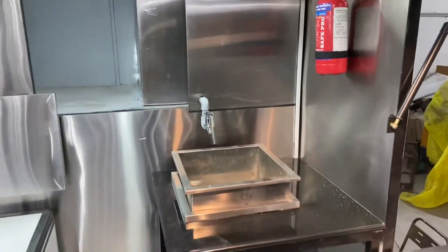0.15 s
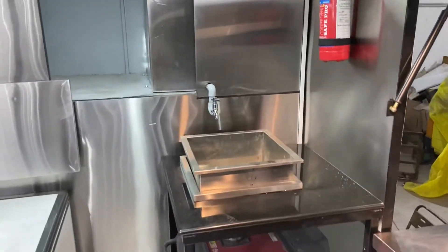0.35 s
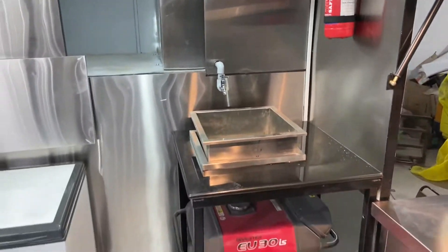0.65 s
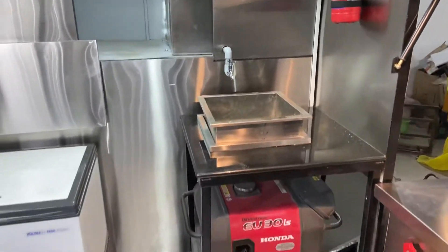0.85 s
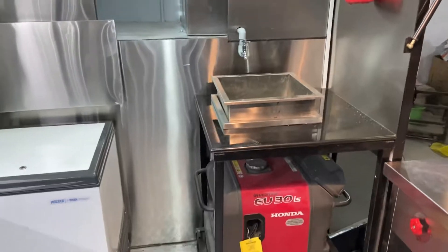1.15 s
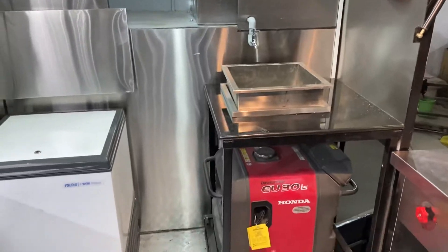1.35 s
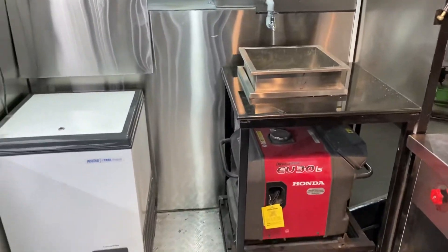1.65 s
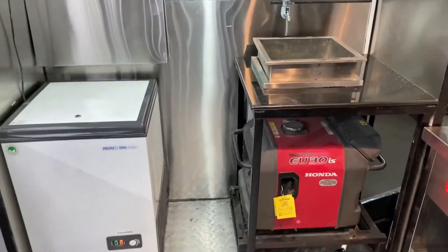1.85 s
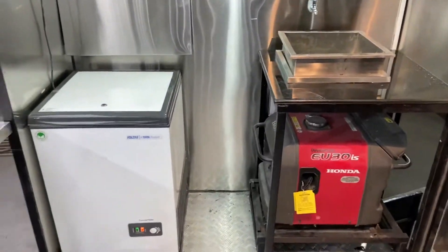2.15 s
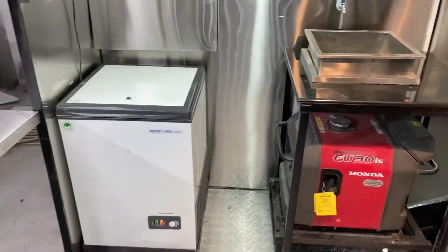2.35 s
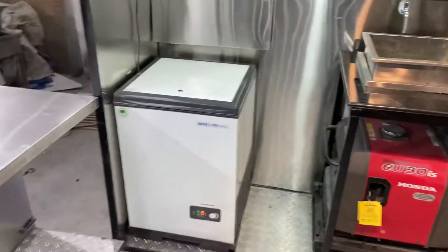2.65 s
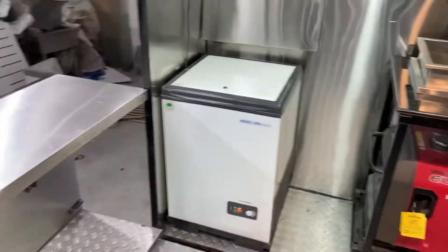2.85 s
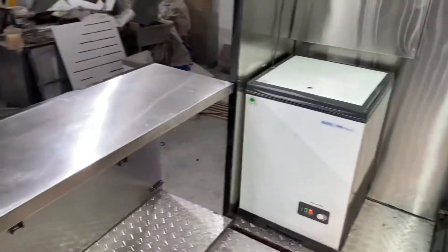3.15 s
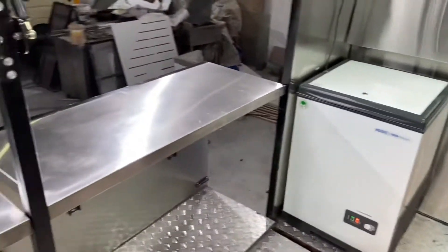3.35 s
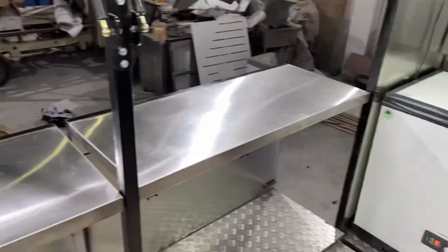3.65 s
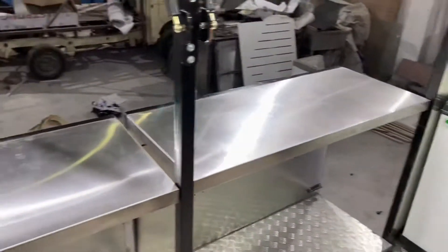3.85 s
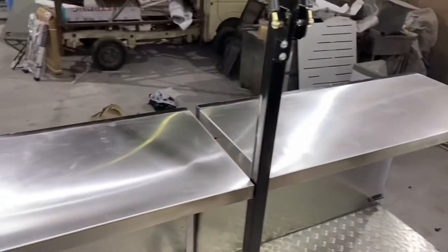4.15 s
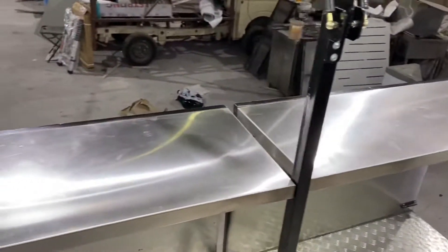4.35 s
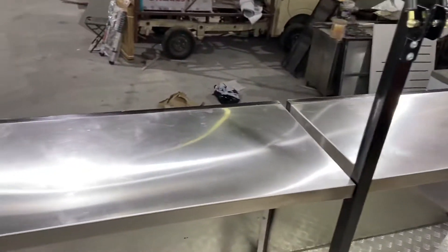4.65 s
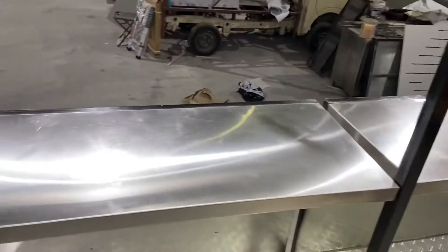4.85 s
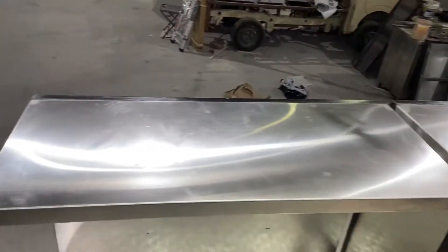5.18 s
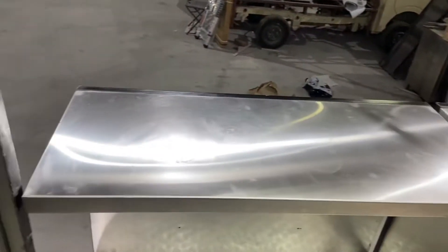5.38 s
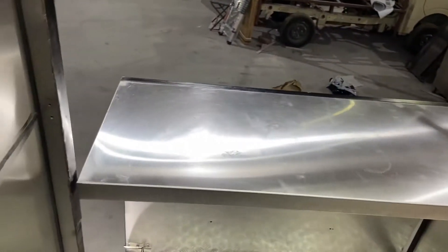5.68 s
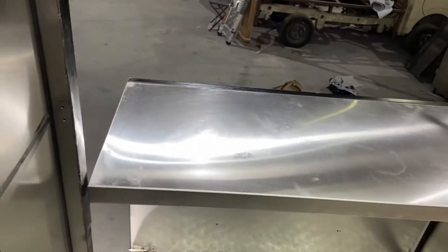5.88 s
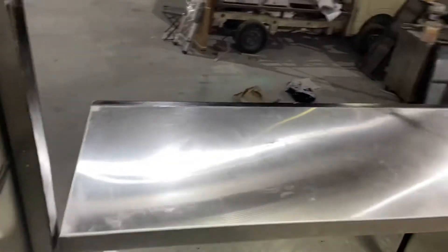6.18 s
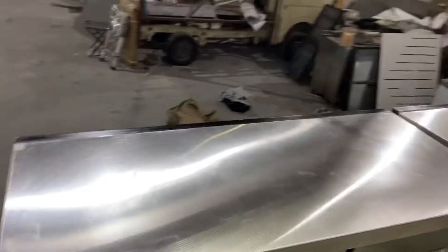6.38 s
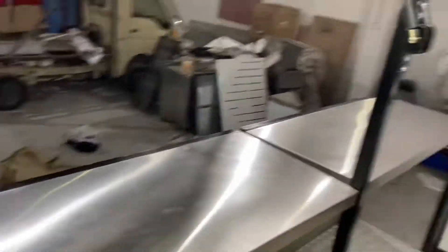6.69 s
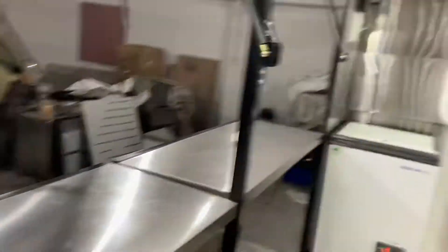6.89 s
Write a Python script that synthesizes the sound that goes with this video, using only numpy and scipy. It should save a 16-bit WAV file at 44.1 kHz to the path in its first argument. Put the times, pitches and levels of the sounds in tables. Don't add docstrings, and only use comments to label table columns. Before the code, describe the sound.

Hand-held stereo pickup in a hard-walled workshop: low droning motors, uneven and slowly shifting in strength, over a dull rumbling wash of air and fans. Barely audible scuffs come first, then a soft double knock and later a duller one. A distant metal clink follows with two thinner bounces, then small knocks, and finally a tiny tick, dry scuff and short low thump.

```python
import sys
import numpy as np
from scipy import signal
from scipy.fft import rfft, irfft, next_fast_len
from scipy.io import wavfile
from scipy.ndimage import uniform_filter1d

SR = 44100
rng = np.random.default_rng(int(sys.argv[2]) if len(sys.argv) > 2 else 0)


def bounce(signal):
    frames = np.transpose(np.atleast_2d(signal))
    limited = np.clip(frames, -1, 1)
    pcm = np.round(limited * 32767).astype(np.int16)
    wavfile.write(sys.argv[1], SR, pcm)


def gain_from_db(level_db):
    decades = np.asarray(level_db, float) / 20
    return 10 ** decades


N = 309714

# pitch [Hz], lead of the left [radians].
PORT_LEAD = [(20, 0), (90, -.37), (180, -.72), (430, -.8), (750, 1), (1290, 2.1), (2200, .3), (3300, .6),
             (7000, 0), (9000, -3.14), (11100, -6.28), (13100, -9.42), (15200, -12.56)]
# pitch [Hz], left over right [dB].
PORT_BALANCE = [(60, -0.5), (150, 1.5), (380, 0.0), (950, -2), (2380, 0), (5980, 0.5), (15000, -0.5)]


def evened(x):
    return x / np.sqrt(np.mean(x ** 2) + 1e-20)


def read(points, hz):
    f, value = np.transpose(points)
    return np.interp(np.log(hz + 1), np.log(f + 1), value)


def add(mix, s, sound):
    part = mix[..., round(s * SR):][..., :sound.shape[-1]]
    part += sound[..., :part.shape[-1]]


def above(x, hz):
    return signal.sosfilt(signal.butter(2, np.clip(hz, 50, 15000), "high", fs=SR, output="sos"), x)


def below(x, hz):
    return signal.sosfilt(signal.butter(2, np.clip(hz, 5, 20000), fs=SR, output="sos"), x)


def walked(t):
    # time in seconds, share of the way [0-1 and a little beyond].
    sweep = [(0.0, 0.027), (0.7, 0.085), (1.5, 0.173), (2.5, 0.247), (3.5, 0.378), (4.3, 0.509),
             (5.0, 0.689), (5.8, 0.973), (6.4, 1.063), (7.03, 1.127)]
    return np.interp(t, *np.transpose(sweep))


def standing(way, crest_db, depth_db, waves, crest):
    return crest_db - depth_db * np.sin(np.pi * (waves * way - crest)) ** 2


def tone(hz, db, turns):
    side = np.array([[0.5], [-0.5]])
    half_lead = side * read(PORT_LEAD, hz)
    level = np.sqrt(2) * gain_from_db(db + side * read(PORT_BALANCE, hz))
    phase = 2 * np.pi * (hz * np.arange(N) / SR - turns)
    return level / np.cos(half_lead) * np.cos(phase + half_lead)


def hums():
    hum_hz = [88.6, 89.05, 97.52, 100.14, 177.13, 178.02, 195.07]
    # crest level in dB, trough depth in dB,
    # waves along the way, crest place in waves.
    hum_waves = [(-31.5, 28, 0.18, 0.12), (-35, 27, .097, 0.16), (-23.5, 17.5, 0.43, -0.11),
                 (-20.5, 29.5, .1, -0.21), (-43, 7, 0.97, 0.58), (-39.5, 6.5, 1.11, 0.53),
                 (-44, 15.5, 0.8, .12)]
    # start [m], length gained along the way [m], drift [m/s].
    hum_paths = [(1.023, -0.223, -0.011), (4.281, -0.367, 0.026), (3.189, 3.903, -0.552),
                 (1.15, -0.033, 0.041), (1.319, -0.801, 0.095), (1.306, 0.387, -0.062),
                 (2.071, 1.949, -0.266)]
    t = np.arange(N) / SR
    way = walked(t)
    out = 0
    for hz, wave, (metres, gained, drift) in zip(hum_hz, hum_waves, hum_paths):
        delay_s = (metres + gained * way + drift * t) / 343
        out = out + tone(hz, standing(way, *wave), hz * delay_s)
    return out


def whine(wander=0.08, flutter_db=1.44):
    order_hz = [300.6, 267.0, 447.0, 357.7, 853.6, 953.7, 1045.4, 897.5]
    # usual level in dB, change in dB,
    # place and width as shares of the way [0-1].
    spots = [(-54, 6, 0.16, .17), (-51.5, -13, 0.38, 0.38), (-65, 12, 0.51, 0.06), (-62.5, 5.5, 1, 0.4),
             (-52.5, -24, .25, .12), (-62, 10, .35, 0.07), (-70, 13, 0.78, 0.27), (-66.5, 10, .55, 0.13)]
    # pitch [Hz], level [dB].
    shaft_lines = [(42.8, -56.5), (49.55, -55.5), (67.3, -52.5), (69.8, -53), (118.7, -49.5), (802, -70.5),
                   (869, -62.5), (836, -62.5)]
    t = np.arange(N) / SR
    way = walked(t)
    steps = np.arange(44) / 6
    lines = []
    for hz, (db, change_db, place, width) in zip(order_hz, spots):
        lines.append((hz, db + change_db * np.exp(-((way - place) / width) ** 2)))
    out = 0
    for hz, db in lines + shaft_lines:
        slip, flutter = rng.standard_normal((2, len(steps)))
        turns = np.interp(t, steps, wander * np.cumsum(slip))
        out = out + tone(hz, db + flutter_db * np.interp(t, steps, flutter), turns)
    return out


def wash(patchy_db=1.0, modal_db=2.0, flicker_db=0.43):
    # pitch [Hz], density [dB per Hz].
    air_colour = [(20, -47), (45, -13.5), (70, -5.5), (110, -1.5), (200, -6.5), (300, -11), (600, -17.5),
                  (870, -15.5), (1300, -18.5), (2500, -24.5), (4250, -32), (7300, -40.5), (11000, -49),
                  (16000, -49.5)]
    frames = N // 512 + 8
    hz = np.fft.rfftfreq(2048, 1 / SR)[:, None]
    a, b, c, d, patches, modes = rng.standard_normal((frames, 1025, 6)).T

    patches = uniform_filter1d(patches, size=30, axis=0)
    patches = evened(uniform_filter1d(patches, size=6, axis=1))
    modes = uniform_filter1d(modes, size=2, axis=0)
    modes = evened(uniform_filter1d(modes, size=24, axis=1))
    flicker = evened(uniform_filter1d(rng.standard_normal(frames), size=4)) * np.clip(hz / 6000, 0.3, 2)

    way = walked(np.arange(frames) * 512 / SR)
    rumble_hz, hiss_db = 350, -0.26
    low = 1 / (1 + (hz / rumble_hz) ** 2)
    rumble_db = standing(way, crest_db=2.87, depth_db=2.2, waves=0.65, crest=0.02)
    swell_db = low * rumble_db + (1 - low) * hiss_db

    field_db = swell_db + patchy_db * patches + modal_db * modes + flicker_db * flicker
    spectra = np.array([a + 1j * b, c + 1j * d]) * gain_from_db(field_db)
    noise = signal.istft(spectra, nperseg=2048, noverlap=1536)[1][:, 1024:N + 1024]
    colour = gain_from_db(read(air_colour, np.fft.rfftfreq(N, 1 / SR)))
    return gain_from_db(-35.5) * evened(irfft(rfft(noise) * colour, N))


def scuff(rise, length, db, low_hz):
    t = np.arange(round(length * SR)) / SR
    grit = gain_from_db(2.4 * rng.exponential(1, SR)[:len(t)])
    grains = rng.standard_normal((2, SR))[:, :len(t)] * grit
    fade = np.clip(np.minimum(t, length - t) / rise, 0, 1)
    return gain_from_db(db) * evened(below(above(grains, low_hz), 9000)) * fade


def knock(db, hz, width_hz, t60):
    t = np.arange(SR // 3) / SR
    a, b = evened(below(rng.standard_normal((2, 2, len(t))), width_hz / 2))
    push = np.exp(-width_hz / 60)
    body = (push + 0.77 * a) * np.sin(2 * np.pi * hz * t) + 1.06 * b * np.cos(2 * np.pi * hz * t)
    body = body / np.sqrt(2 * np.mean(body[0, :SR // 25] ** 2))
    return gain_from_db(db + 2 - 60 * t / t60) * body * np.minimum(t / 0.0021, 1)


def clink(db, low_hz, tick_db):
    # pitch [Hz], level [dB], decay by 60 dB [s].
    metal_modes = [(654, 2, 0.34), (745, -1, 0.21), (1700, 0, 0.16), (2317, 1.5, 0.14), (3100, -15, 0.14),
                   (3430, -6, 0.23), (3880, -7, 0.22), (4440, -10, .16), (4930, -2, 0.19), (6360, -8, 0.2),
                   (6720, -3.5, 0.13)]
    t = np.arange(SR // 2) / SR
    top_hz = 5350 + 0.64 * low_hz
    t60 = max(0.22 - 0.016 * low_hz / 1000, 0.02)
    ring_db = -0.5 - 1.5 * low_hz / 1000

    smear = rng.standard_normal((2, len(t)))
    tick = gain_from_db(tick_db - 60 * t / 0.024) * smear[:, ::-1]
    early = gain_from_db(-60 * np.maximum(t - 0.009, 0) / t60)
    tail = gain_from_db(-18.5 - 60 * t / 1.2)
    crack = evened(below(smear, top_hz)) * (early + tail)
    bands = evened(below(rng.standard_normal((len(metal_modes), *smear.shape)), 90))
    ring = 0
    for (hz, mode_db, decay), band in zip(metal_modes, bands):
        ring = ring + gain_from_db(mode_db - 60 * t / decay) * np.sin(2 * np.pi * hz * t) * band
    struck = above(tick + crack + gain_from_db(ring_db) * ring, low_hz)
    return gain_from_db(db - 7.5) * struck * np.minimum(t / 0.0011, 1)


def ports(pair):
    # pitch [Hz], likeness [0-1].
    likeness = [(60, 0.86), (260, 1), (430, 0.62), (620, 0.053), (1200, 0.81), (1700, 0.19), (2500, 0.46),
                (4600, 0.65), (5400, 0.12), (7000, 0.97), (15000, 1)]
    size = next_fast_len(N)
    hz = np.fft.rfftfreq(size, 1 / SR)
    a, b = rfft(pair, size)
    same = np.clip(read(likeness, hz), 0, 1)
    turn = np.exp(0.5j * read(PORT_LEAD, hz)) * gain_from_db(read(PORT_BALANCE, hz) / 2)
    right = same * a + np.sqrt(1 - same ** 2) * b
    return irfft([a * turn, right / turn], size)[:, :N]


def scene():
    # start in seconds, peak level in dB, lowest pitch in Hz, tick level in dB.
    clinks = [
        (4.908, -25.5, 600, -12),
        (5.0515, -33, 1000, 6),
        (5.189, -34, 3500, 5),
        (6.9175, -43.5, 8000, 15),
    ]
    # start in seconds, peak level in dB, pitch in Hz, width in Hz, decay by 60 dB in seconds.
    knocks = [
        (2.992, -35.5, 420, 60, 0.19),
        (3.03, -30.5, 320, 88, 0.14),
        (4.44, -33.5, 908, 270, 0.25),
        (5.585, -30, 206.4, 40, 0.29),
        (4.912, -34.5, 379, 106, .2),
        (4.914, -37.5, 671, 58, 0.24),
        (5.9, -36, 534, 93, .2),
        (6.9295, -27, 950, 34, .025),
        (6.9985, -19.5, 78, 3, 0.24),
    ]
    # start, rise and length in seconds, level in dB, lowest pitch in Hz.
    scuffs = [
        (3.2, .12, 0.25, -65, 3500),
        (5.37, .03, 0.088, -58, 4600),
        (5.5, .04, 0.13, -62, 5100),
        (6.925, .015, 0.13, -55, 5000),
        (6.98, .03, .08, -49, 4400),
        (3.1, .1, 0.31, -64.5, 6000),
        (1.9, .05, 0.14, -66, 8000),
        (0.74, 0.074, 0.32, -61.5, 3500),
    ]
    field = wash()
    for table, source in [(scuffs, scuff), (knocks, knock), (clinks, clink)]:
        for s, *row in table:
            add(field, s, source(*row))
    return ports(field) + hums() + whine()


def band_limit(x):
    return signal.sosfilt(signal.butter(12, 16420, fs=SR, output="sos"), x)


def record(dry):
    limited = signal.oaconvolve(dry, signal.firwin(255, 15800, fs=SR)[None], "same")
    return band_limit(limited)


dry = scene()
out = record(dry)
bounce(out)
```